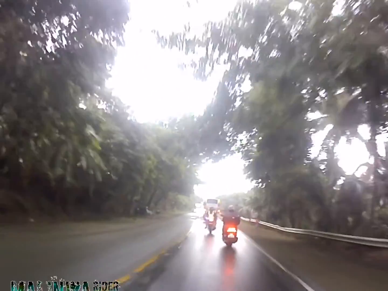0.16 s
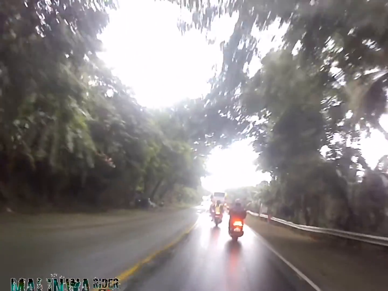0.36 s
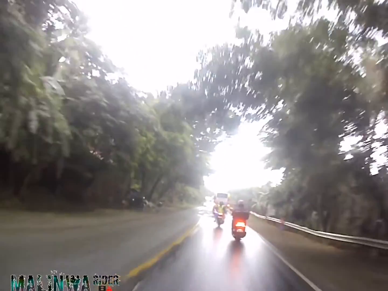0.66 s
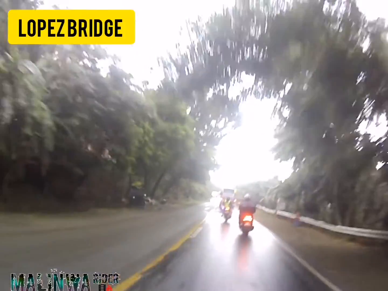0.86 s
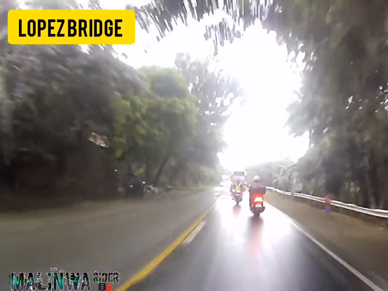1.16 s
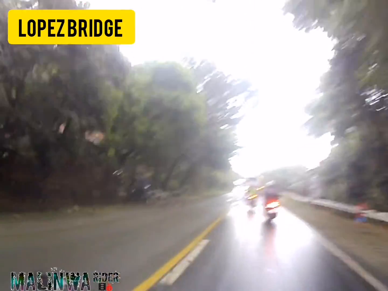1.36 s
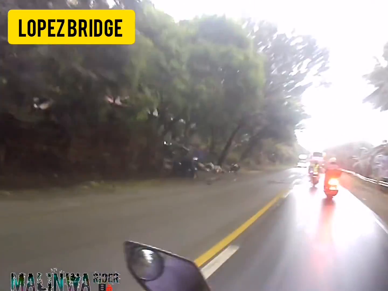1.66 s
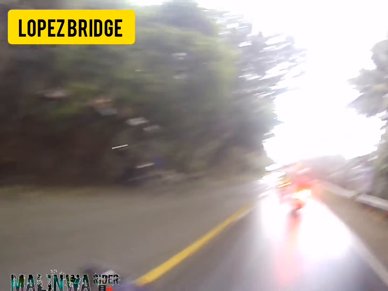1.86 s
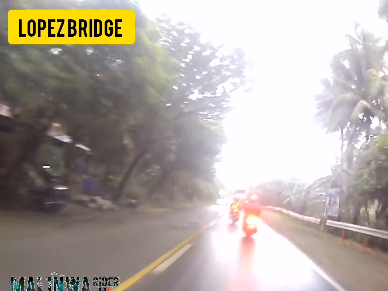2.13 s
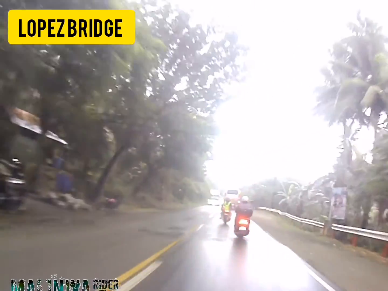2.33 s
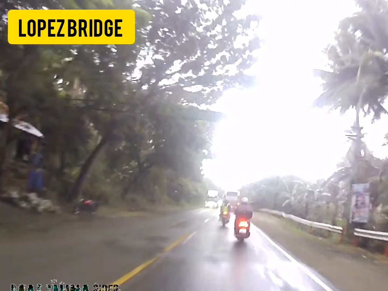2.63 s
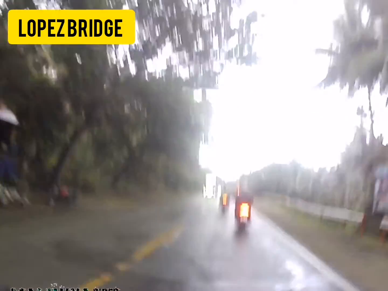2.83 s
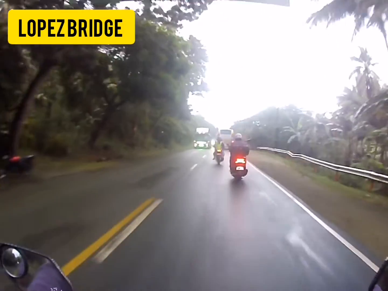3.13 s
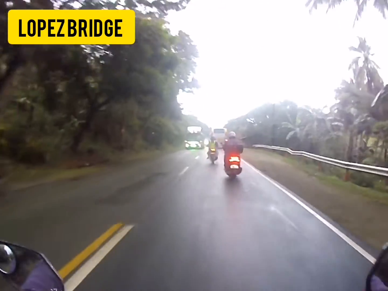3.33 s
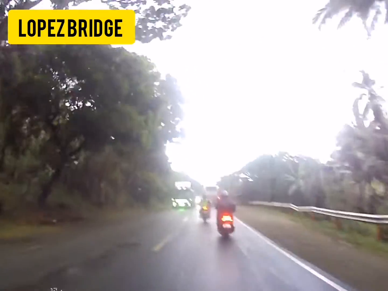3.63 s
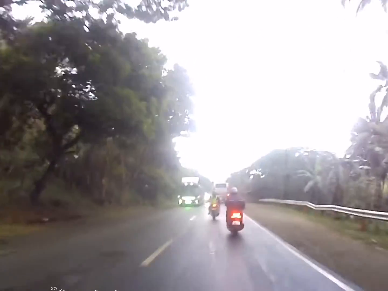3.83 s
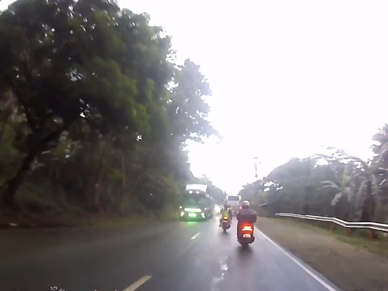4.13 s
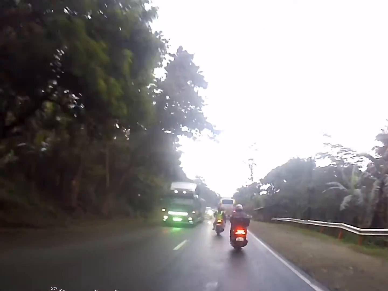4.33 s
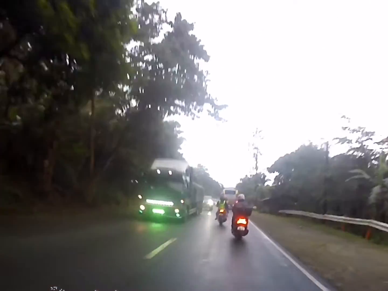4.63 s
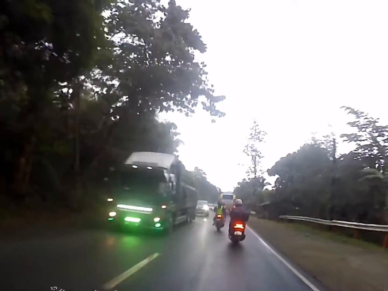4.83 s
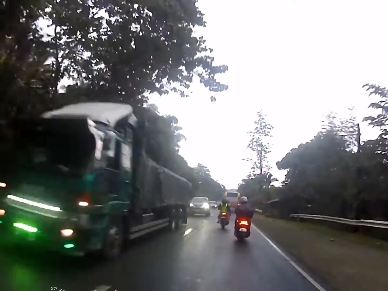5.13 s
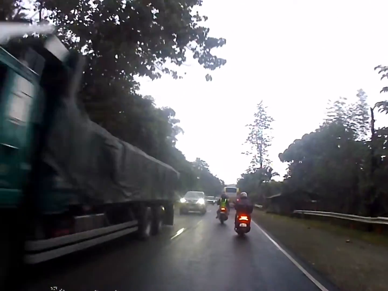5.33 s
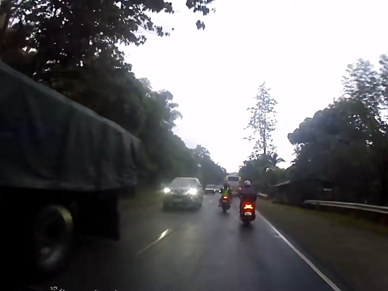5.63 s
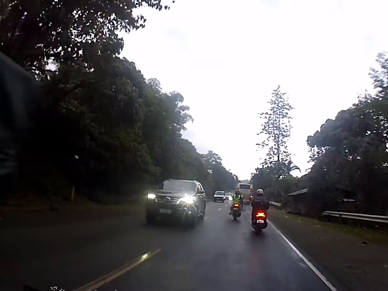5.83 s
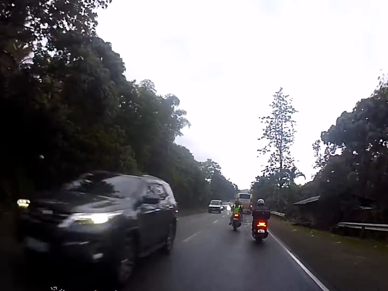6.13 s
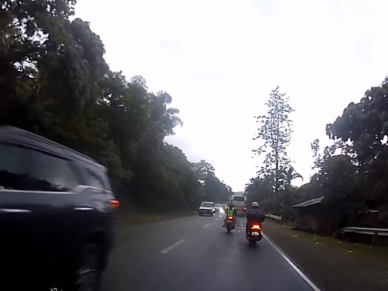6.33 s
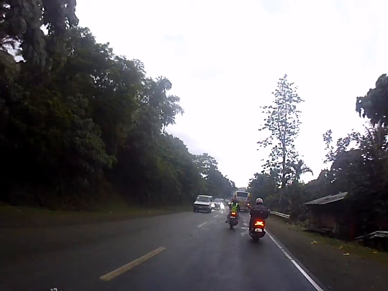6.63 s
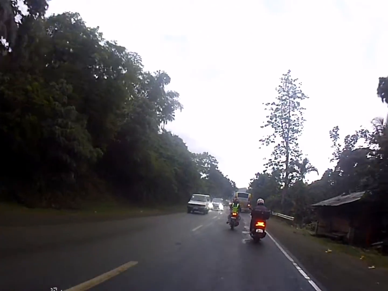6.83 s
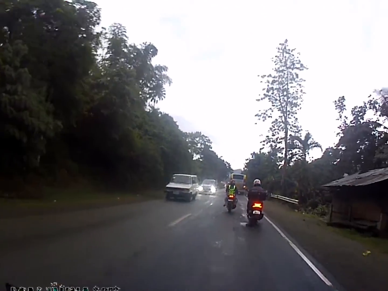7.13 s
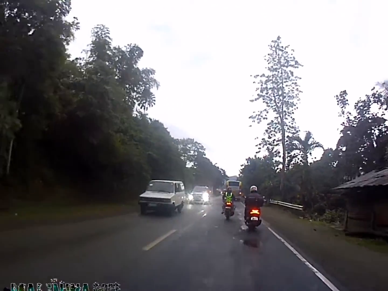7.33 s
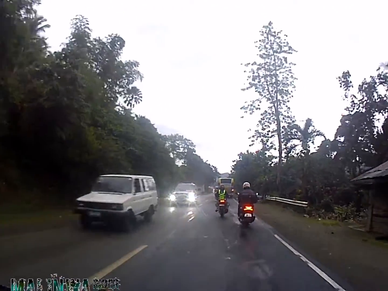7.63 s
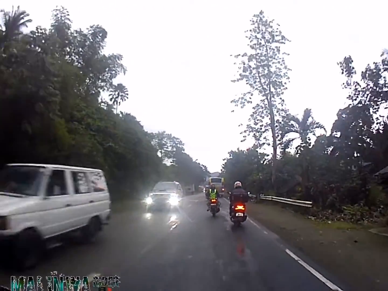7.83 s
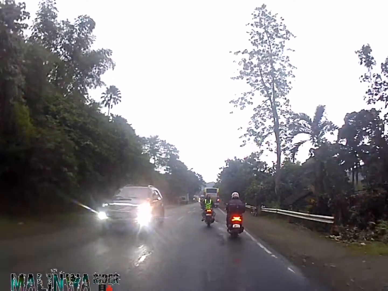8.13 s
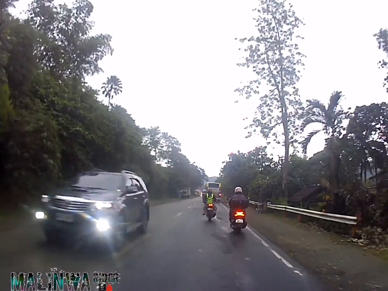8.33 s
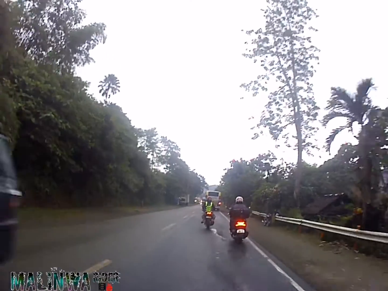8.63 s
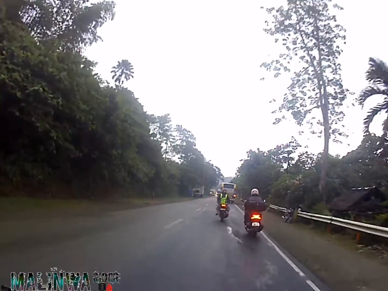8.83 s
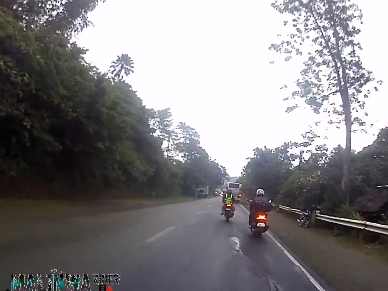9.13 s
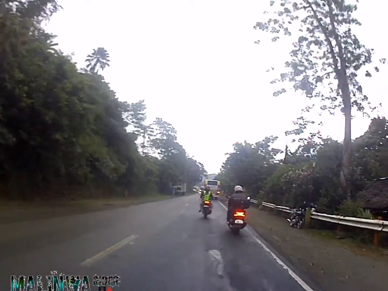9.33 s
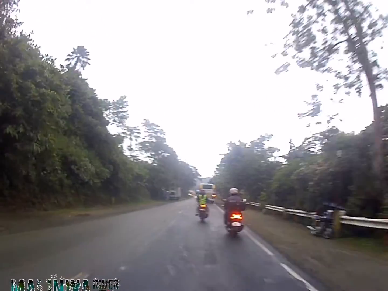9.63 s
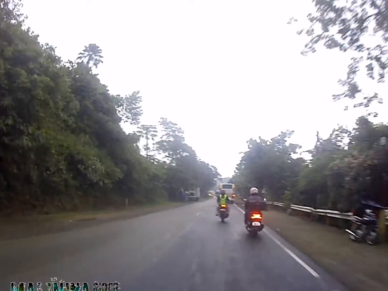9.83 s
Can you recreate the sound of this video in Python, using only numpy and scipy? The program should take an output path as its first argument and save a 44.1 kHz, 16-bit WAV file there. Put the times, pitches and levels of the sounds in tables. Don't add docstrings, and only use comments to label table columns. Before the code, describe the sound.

A ten-second ride on a small motorcycle along a wet open road, heard by one microphone inside a closed case. Throughout there is dull, boxy tyre roar ringing around the middle range, a low fluttering one-cylinder engine and two steady, slightly wavering exhaust hums from bikes ahead. Wind beats in uneven low lumps, with stronger thumps around 1.5-1.8, 2.8, 4.6-4.9, 6, 6.9 and 9 seconds. Fine spray hiss grows from about 4.5; at 5.5-5.9 a lorry passes with the biggest rumble, boom and bright water hiss. A car whooshes by at 6.3. A tiny drop ticks at 6.5; faint high bird chirps come at 7.1-7.3. A van passes at 8.0 with a short falling whine, another car at 8.5, then a soft tick at 8.7. The roar continues, with a very faint receding whine at 9.3, over slight hiss until the end.

```python
import sys
import numpy as np
from scipy import signal
from scipy.fft import rfft, irfft, next_fast_len
from scipy.io import wavfile
from scipy.ndimage import uniform_filter1d, map_coordinates

SR = 44100
rng = np.random.default_rng(int(sys.argv[2]) if len(sys.argv) > 2 else 0)


def generate_wav(signal):
    frames = np.transpose(np.atleast_2d(signal))
    scaled = np.clip(frames, -1, 1) * 32767
    pcm = np.round(scaled).astype(np.int16)
    wavfile.write(sys.argv[1], SR, pcm)


def amplitude_ratio(level_db):
    exponent = np.asarray(level_db, float) / 20
    return 10 ** exponent


N = 439677

# start_s, coarseness_db, wetness_db
ROAD = [(0, -0.5, 0.5), (.97, -1.5, 0.5), (1.11, 2, .5), (2.6, 1.5, 0), (2.72, -1, .5), (2.8, 1, 1),
        (3.35, 1, 0.5), (3.62, 0.5, -0.5), (3.8, 2, 2.5), (4.3, 0.5, 2), (5, -0.5, 2.5), (6.6, -3, -1),
        (6.9, -0.5, -1.5), (7.15, 0.5, -3.5), (9.2, 1, -0.5), (9.33, 0.5, 0), (9.6, 0.5, -2),
        (9.97, 2.5, 0.5)]
# freq_hz, density_db_per_hz
TREAD = [(150, -11.5), (250, -2), (390, -3.5), (480, -8), (640, -13.5), (900, -11), (2000, -10.5),
         (5000, -15.5)]
# freq_hz, gain_db
CASE = [(850, -1), (1000, 4.5), (1120, 12.5), (1230, 12), (1350, 11.5), (1600, 3.5), (1950, -3.5),
        (2400, -13), (2850, -13), (3200, -9.5), (3600, -16.5), (4200, -15.5), (4700, -21), (5150, -25.5)]
# nose_abreast_s, length_s, roar_db, rumble_db, water_db
TRAFFIC = [
    (5.524, 0.4, -33, -35.5, -44.5),
    (6.27, .26, -37, -41.5, -55.5),
    (8.01, 0.16, -34.5, -39.5, -51),
    (8.46, 0.31, -37, -35.5, -52.5),
]
# freq_hz, density_db_per_hz
FLANK = [(180, -40), (260, -1), (450, -11), (750, -5.5), (1000, -14.5), (1500, -42), (3000, -120)]
# freq_hz, gain_db
VENT = [(3500, -18), (4800, -5), (5200, -8.5), (5900, -2.5), (6500, -2), (7300, -6.5), (7900, -12),
        (9000, -12), (9900, -7.5), (10500, -5), (11100, -13), (12400, -20), (14300, -27), (15700, -40)]
# freq_hz, gain_db
FAN_TINT = [(4400, 11), (5200, -2), (6000, -1), (7100, 9.5), (8500, -4), (10400, 1), (12000, 0), (13200, 6),
            (14300, 14), (15000, 13), (15700, 10)]
# start_s, hold_s, level_db
FANS = [
    (5.594, 0.13, -53.5),
    (8.12, .05, -69),
    (8.6, .15, -67.5),
]
# start_s, firing_hz, throttle_db
ENGINE = [(0, 30.7, -46.5), (1, 28.5, -48), (2, 26.7, -42), (2.6, 28.5, -48.5), (3.1, 29.8, -41.5),
          (3.6, 31.6, -45), (4.1, 23.6, -49), (5.1, 29.6, -42), (5.6, 28, -54.5), (6.6, 28.2, -47),
          (7.2, 26, -44.5), (7.6, 27.6, -48.5), (8.1, 29.4, -47), (8.8, 28.6, -44.5), (9.4, 30.6, -51.5),
          (9.97, 27.4, -42.5)]
# order, level_db
PIPE = [(2, -1.5), (3, 2.5), (4, 2), (5, 4.5), (6, -7), (7, -11), (9, -25), (12, -10.5)]
# start_s, pitch_hz, level_db
LEADER = [(0, 225.3, -44), (.9, 225.2, -44.5), (1.4, 222.1, -41), (2, 225.8, -43), (2.9, 229.4, -39),
          (3.3, 231.1, -43), (4.8, 228.2, -40), (5.3, 229.1, -43.5), (6.3, 230.6, -42), (6.7, 234.2, -44),
          (7.8, 231, -46.5), (9, 231.7, -44), (9.97, 230.9, -41)]
# start_s, pitch_hz, level_db
SECOND = [(0, 167.3, -49), (1.6, 169, -57), (2.4, 170.7, -49), (2.9, 167.2, -44), (3.9, 176.4, -38.5),
          (5.2, 178.7, -56), (6.8, 179.8, -52), (7.6, 182.3, -44.5), (8.6, 180, -49.5), (9.7, 177, -41.5),
          (9.97, 177.4, -44)]
# start_s, strength_db
WIND = [(0, -29.5), (.75, -34), (1.4, -27), (1.9, -32.5), (2.55, -32.5), (3.2, -32.5), (3.6, -36.5),
        (4.3, -31.5), (5.3, -32), (5.7, -28), (6.5, -33.5), (7.3, -33), (7.75, -33.5), (8.3, -27.5),
        (8.8, -34), (9.4, -32.5), (9.97, -30)]
# freq_hz, density_db_per_hz
BUFFET = [(2, -48), (4, -1), (16, 8.5), (45, 9), (70, 3.5), (120, -12), (300, -62), (900, -120)]
# freq_hz, density_db_per_hz
FLUTTER = [(35, -48), (65, -3.5), (100, 3), (150, -3.5), (200, -1.5), (280, -22.5), (500, -54),
           (1500, -120)]
# peak_s, slow_db, fast_db
EDDIES = [(.6, -27, -52), (.94, -36, -44), (1.34, -32, -29), (1.46, -30, -31), (1.62, -25, -40),
          (1.79, -22, -24), (2.3, -30, -38), (2.47, -33, -47), (2.8, -30, -21.5), (3.13, -33, -38),
          (3.36, -31, -36), (4.28, -29, -26.5), (4.44, -29, -37), (4.58, -23, -27.5), (4.91, -25, -27),
          (5.22, -33, -41), (5.64, -35, -41), (6.0, -19, -30), (6.12, -34, -28), (6.34, -33, -23.5),
          (6.89, -33, -19.5), (7.02, -24.5, -32), (6.6, -29, -37), (7.92, -29, -39), (8.55, -35, -39),
          (8.97, -19, -30), (9.89, -27, -38)]
# peak_s, peak_db, push_hz, direction
BUMPS = [(1.528, -20, 60, -1), (1.804, -18, 60, 1), (1.828, -19, 65, -1), (2.805, -18, 66, -1),
         (4.581, -17, 45, 1), (4.912, -19, 35, 1), (5.995, -18, 34, -1), (7.902, -17, 50, -1),
         (8.135, -18, 43, 1), (9.028, -18, 28, -1), (6.137, -18, 50, -1), (6.145, -18, 45, 1),
         (6.321, -14, 45, -1), (6.334, -18, 40, 1), (8.981, -14, 28, -1), (6.869, -15, 48, -1),
         (6.885, -11, 72, -1), (6.907, -15, 60, -1), (6.914, -20, 70, 1), (8.989, -19, 65, 1)]
# start_s, length_s, start_hz, end_hz, level_db
BIRD = [
    (7.062, 0.021, 5750, 5610, -67),
    (7.112, .025, 5710, 5520, -71),
    (7.214, .024, 6300, 6400, -61),
    (7.24, 0.011, 6260, 6150, -62),
    (7.277, .014, 6300, 6250, -65),
    (7.295, 0.049, 6210, 6050, -73),
]
# start_s, length_s, start_hz, end_hz, level_db
VAN_WHINE = [
    (8.045, 0.0927, 1990, 1900, -41),
    (9.3, .19, 1890, 1700, -58),
    (8.02, 0.14, 3030, 2700, -58),
]
# start_s, peak_db
DROPS = [
    (6.532, -53),
    (8.686, -58),
]
# freq_hz, density_db_per_hz
SELF_NOISE = [(3000, -60), (7000, -1), (12000, -3), (14300, -3), (15700, -9)]
# pitch_hz, level_db
WHISTLES = [(5023, -90), (12920, -102)]

SPLITS_HZ = (900, 2100, 5100)
TYRE_DB = (-39.5, -40, -56)
COARSE_SHARE, WET_SHARE = (0.57, 1.3, 0.18), (0.12, 0.1, 0.9)
SEAMS_DB, PUDDLES_DB = 1.1, 0.7
LANE_M, CLOSING_M_S = 3.85, 22.8
SHADOW = 2.7
RUMBLE_LAG_S = 0.057
WATER_LAG = 0.39
MIST_DB, MIST_SHARE = -69, 1
MIST_UNDER_DB, MIST_GROWS = -59.5, 1.64
MIST_REACH_S, MIST_EARLY_S, MIST_FADE_DB_S = 0.47, 0.078, 19
FAN_RISE_DB_S, FAN_FALL_DB_S = 22, 52
FLUTTER_DB, FLUTTER_GROWS = -33.5, 0.67
EDDY_S = 0.029
OFFSET = -0.021
FADE_S = 0.003


def unit(x):
    return x / np.sqrt(np.mean(x ** 2) + 1e-20)


def along(points, hz):
    f, v = np.transpose(points)
    return np.interp(np.log(hz + 1), np.log(f + 1), v)


def curves(rows):
    s, *cols = np.transpose(rows)
    return [np.interp(np.arange(N) / SR, s, c) for c in cols]


def wobble(rate_hz):
    knots = rng.standard_normal(int(N * rate_hz / SR) + 4)
    return map_coordinates(knots, [np.arange(N) * rate_hz / SR])


def rush(gain, patchy_db):
    z = signal.stft(rng.standard_normal(N + 512), nperseg=512)[2]
    field = uniform_filter1d(rng.standard_normal(z.shape), size=4, axis=0)
    field = uniform_filter1d(field, size=16, axis=1)
    x = signal.istft(z * amplitude_ratio(patchy_db * unit(field)), nperseg=512)[1]
    m = next_fast_len(N + 8192)
    spectrum = rfft(x, m) * gain(np.fft.rfftfreq(m, 1 / SR))
    return unit(irfft(spectrum, m)[:N])


def tone(turns, level_db, rough):
    size = amplitude_ratio(level_db + 6 * rough * wobble(6))
    phase_turns = turns + rng.random() + rough * wobble(8) / 4
    return np.sqrt(2) * size * np.sin(2 * np.pi * phase_turns)


def summed(*levels_db):
    return 10 * np.log10(sum(amplitude_ratio(db) ** 2 for db in levels_db))


def passing(nose_s, length_s):
    t = np.arange(N) / SR
    ahead_s = np.clip(nose_s - t, 0, None)
    behind_s = np.clip(t - nose_s - length_s, 0, None)
    gap_m = CLOSING_M_S * (ahead_s + SHADOW * behind_s)
    return -10 * np.log10(1 + (gap_m / LANE_M) ** 2)


def tyre_levels():
    coarse_db, wet_db = curves(ROAD)
    own = [db + a * coarse_db + b * wet_db for db, a, b in zip(TYRE_DB, COARSE_SHARE, WET_SHARE)]
    rumble = [db + passing(s + RUMBLE_LAG_S, n) for s, n, _, db, _ in TRAFFIC]
    roar = [db + passing(s, n) for s, n, db, _, _ in TRAFFIC]
    water = [db + passing(s + WATER_LAG * n, n * (1 - WATER_LAG)) for s, n, _, _, db in TRAFFIC]
    return [summed(mine, *theirs) for mine, theirs in zip(own, (rumble, roar, water))]


def road(firing_turns):
    def below(hz, edge_hz):
        return 1 / (1 + (hz / edge_hz) ** 12)

    edges_hz = (1e-3, *SPLITS_HZ)
    total = np.zeros(N)
    for level_db, lo, hi, patchy_db in zip(tyre_levels(), edges_hz, edges_hz[1:], (0.6, 0.8, 0.9)):
        def gain(hz):
            band = np.sqrt(abs(below(hz, hi) - below(hz, lo)))
            return amplitude_ratio(along(TREAD, hz) + along(CASE, hz)) * band
        total += amplitude_ratio(level_db) * rush(gain, patchy_db)
    beat = 1 + 0.067 * np.cos(2 * np.pi * firing_turns)
    return total * beat * amplitude_ratio(SEAMS_DB / 2 * wobble(7))


def flanks():
    rumble_db = uniform_filter1d(tyre_levels()[0], size=SR // 8)
    boom_db = -40.5 + 2 * (rumble_db + 34.5) + 2 * SEAMS_DB * wobble(7)
    return amplitude_ratio(boom_db) * rush(lambda hz: amplitude_ratio(along(FLANK, hz)), patchy_db=1.4)


def mist_db():
    t = np.arange(N) / SR
    top_db = TRAFFIC[0][-1]
    clouds = []
    for nose_s, *_, water_db in TRAFFIC:
        late_s = t - nose_s + MIST_EARLY_S
        near_db = 10 * np.log10(1 + (late_s / MIST_REACH_S) ** 2)
        loss_db = np.where(late_s < 0, near_db, MIST_FADE_DB_S * late_s)
        clouds.append(MIST_UNDER_DB + MIST_GROWS * (water_db - top_db) - loss_db)
    return summed(MIST_DB + MIST_SHARE * curves(ROAD)[1], *clouds)


def fan_db():
    t = np.arange(N) / SR
    fans = []
    for s, hold_s, db in FANS:
        rise_db = FAN_RISE_DB_S * np.minimum(t - s, 0)
        fall_db = FAN_FALL_DB_S * np.clip(t - s - hold_s, 0, None)
        fans.append(db + rise_db - fall_db)
    return summed(*fans)


def spray():
    def vent(hz):
        return amplitude_ratio(along(VENT, hz)) * (hz > 3000)

    mist = amplitude_ratio(mist_db()) * rush(vent, patchy_db=1.05)
    fans = amplitude_ratio(fan_db()) * rush(lambda hz: vent(hz) * amplitude_ratio(along(FAN_TINT, hz)), patchy_db=0.0)
    droplets = amplitude_ratio(0.5 * wobble(14) + 0.5 * wobble(350))
    return unit(droplets * amplitude_ratio(PUDDLES_DB * wobble(7))) * (mist + fans)


def engine(firing_turns, throttle_db):
    return sum(tone(round(k) * firing_turns, throttle_db + db, rough=0.45) for k, db in PIPE)


def bikes_ahead():
    drones = map(curves, (LEADER, SECOND))
    return sum(tone(np.cumsum(hz) / SR, db, rough=0.28) for hz, db in drones)


def wind_levels():
    strength_db, = curves(WIND)
    flutter_db = FLUTTER_DB + FLUTTER_GROWS * (strength_db + 32.5)
    t = np.arange(N) / SR
    shape = [np.exp(-np.clip(((t - s) / EDDY_S) ** 2, 0, 30)) for s, _, _ in EDDIES]
    slow, fast = (amplitude_ratio(np.array(EDDIES)[:, k]) ** 2 @ shape for k in (1, 2))
    return [10 * np.log10(amplitude_ratio(db) ** 2 + burst) for db, burst in ((strength_db, slow), (flutter_db, fast))]


def wind():
    buffet_db, flutter_db = wind_levels()
    lumps = wobble(14)
    buffet = unit(amplitude_ratio(0.84 * lumps) * rush(lambda hz: amplitude_ratio(along(BUFFET, hz)), patchy_db=-0.1))
    flutter = unit(amplitude_ratio(1.7 * lumps) * rush(lambda hz: amplitude_ratio(along(FLUTTER, hz)), patchy_db=0.7))
    return amplitude_ratio(buffet_db + 0.7) * buffet + amplitude_ratio(flutter_db - 2.5) * flutter


def bumps():
    t = np.arange(N) / SR
    out = np.zeros(N)
    for s, db, push_hz, way in BUMPS:
        near = slice(round(s * SR) - SR // 20, round(s * SR) + SR // 20)
        u = (4.7 * push_hz * (t[near] - s)) ** 2
        out[near] += np.sign(way) * amplitude_ratio(db) * (2 * np.exp(-u) - np.exp(-u / 4))
    return out


def glides(rows):
    out = np.zeros(N)
    for s, length_s, start_hz, end_hz, db in rows:
        n = round(length_s * SR)
        turns = np.cumsum(np.linspace(start_hz, end_hz, n)) / SR
        size = amplitude_ratio(db + 2.0 + 3.1 * wobble(237)[:n]) * np.sqrt(np.hanning(n))
        out[round(s * SR):][:n] += size * np.sin(2 * np.pi * turns)
    return out


def drops():
    out = np.zeros(N)
    t = np.arange(SR // 100) / SR
    for s, db in DROPS:
        crack = np.diff(rng.standard_normal(len(t) + 1)) * amplitude_ratio(-60 * t / 0.004)
        out[round(s * SR):][:len(t)] += amplitude_ratio(db - 6) * crack
    return out


def scene():
    firing_hz, throttle_db = curves(ENGINE)
    firing_turns = np.cumsum(firing_hz) / SR
    traffic_and_tyres = road(firing_turns) + flanks() + spray()
    motors = engine(firing_turns, throttle_db) + bikes_ahead()
    jolts = bumps()
    slack = 1 / (1 + 25 * abs(uniform_filter1d(abs(jolts), size=SR // 25)))
    small = glides(BIRD) + glides(VAN_WHINE) + drops()
    return (traffic_and_tyres + motors + slack * wind() + jolts + small)[None]


def low_pass(x):
    return signal.sosfilt(signal.butter(12, 15700, fs=SR, output="sos"), x)


def record(dry):
    t = np.arange(N) / SR
    whistles = sum(tone(hz * t, db, rough=0.1) for hz, db in WHISTLES)
    hiss = amplitude_ratio(-78.0) * rush(lambda hz: amplitude_ratio(along(SELF_NOISE, hz)) * (hz > 3000), patchy_db=0.0)
    gate = np.sin(np.pi / 2 * np.clip(np.minimum(t, t[::-1]) / FADE_S, 0, 1)) ** 2
    return low_pass(gate * (dry + OFFSET + whistles + hiss))


dry = scene()
out = record(dry)
generate_wav(out)
```